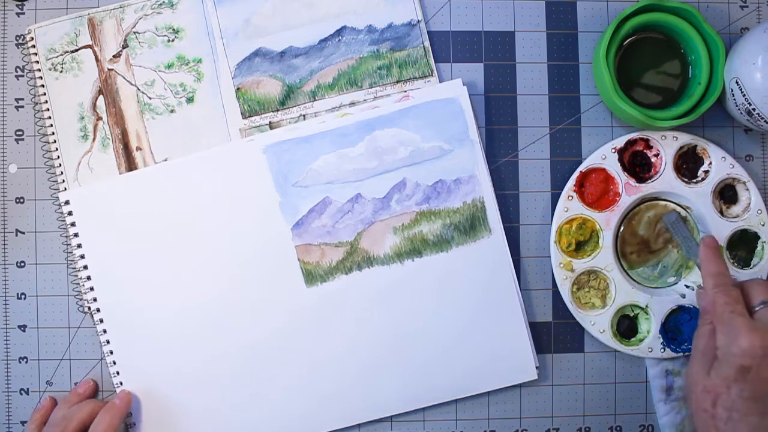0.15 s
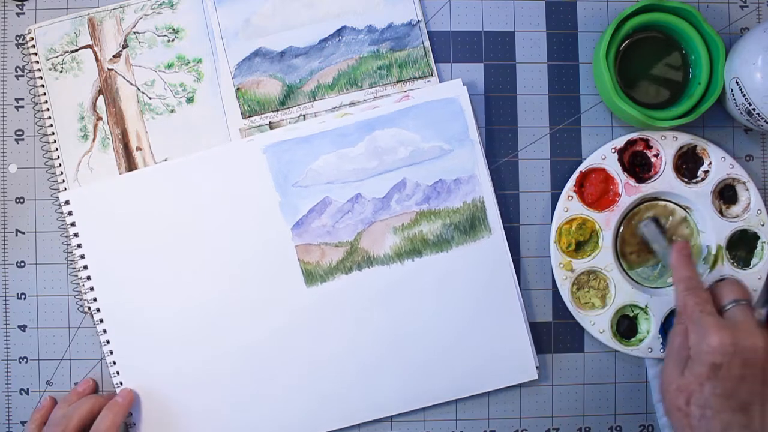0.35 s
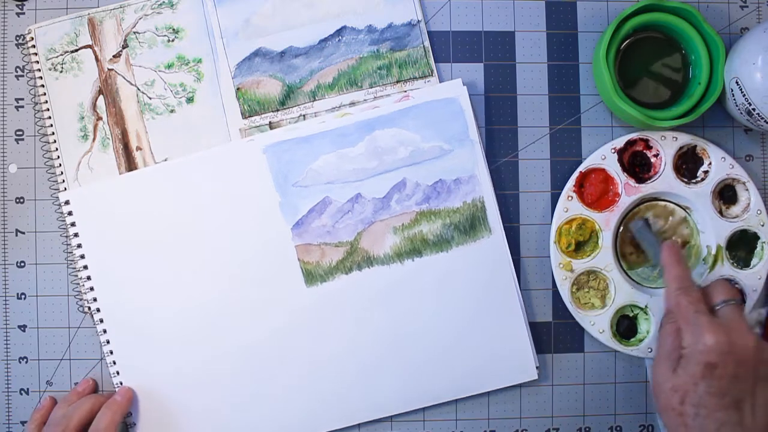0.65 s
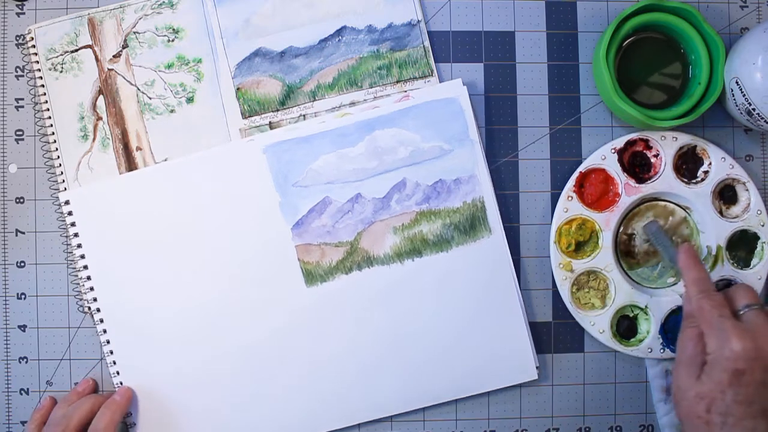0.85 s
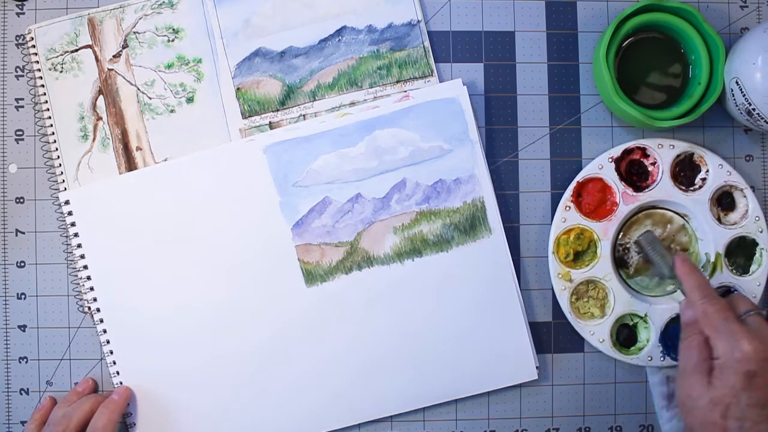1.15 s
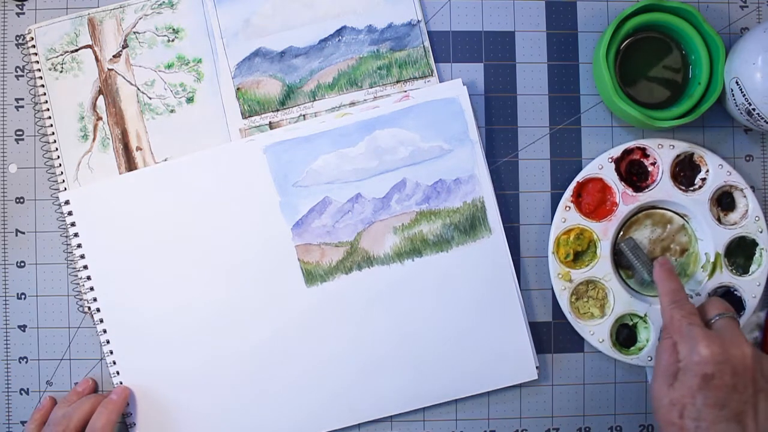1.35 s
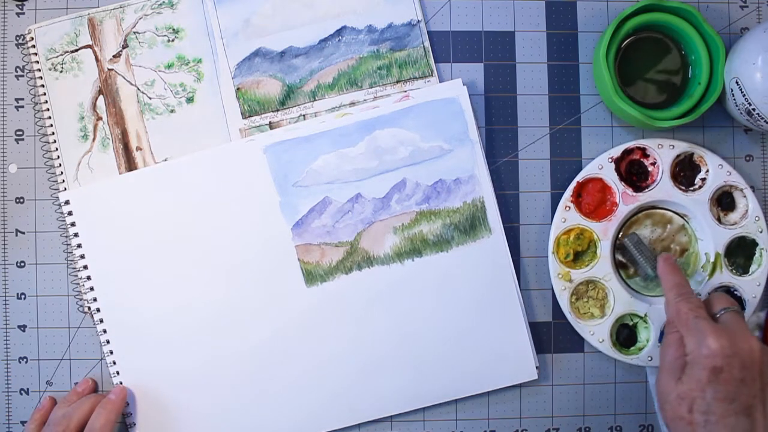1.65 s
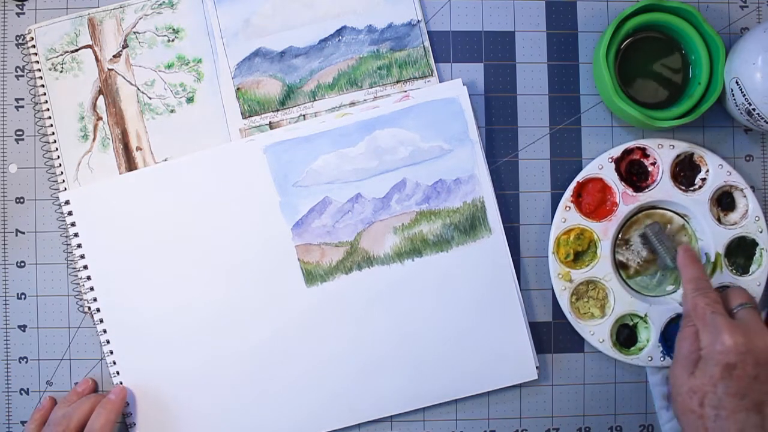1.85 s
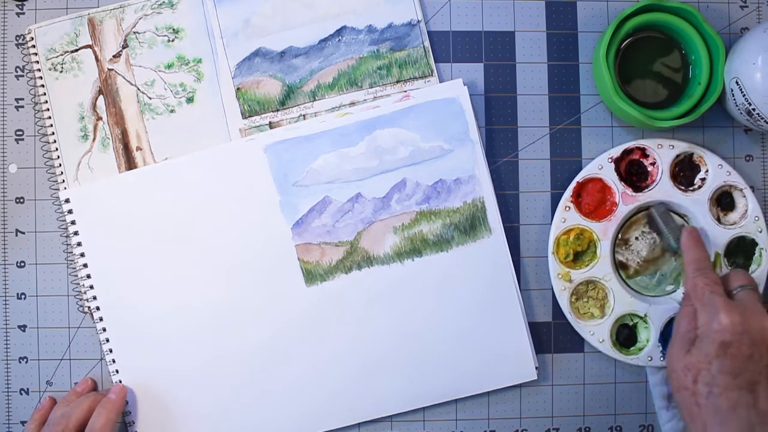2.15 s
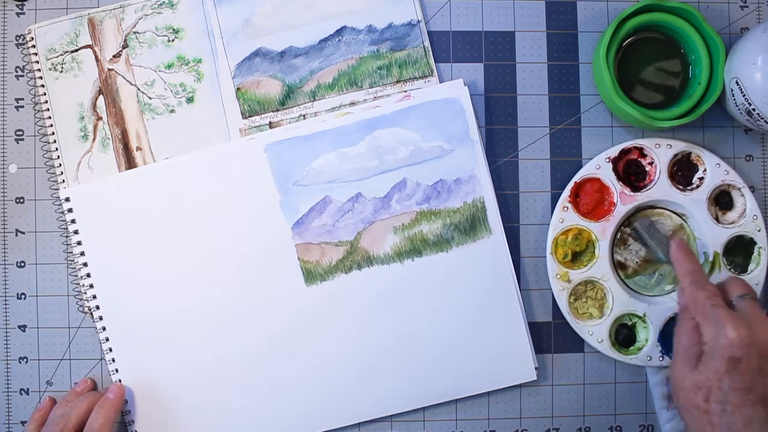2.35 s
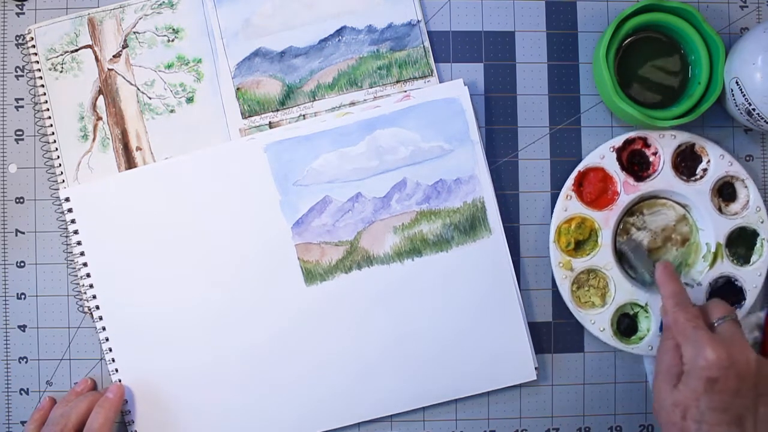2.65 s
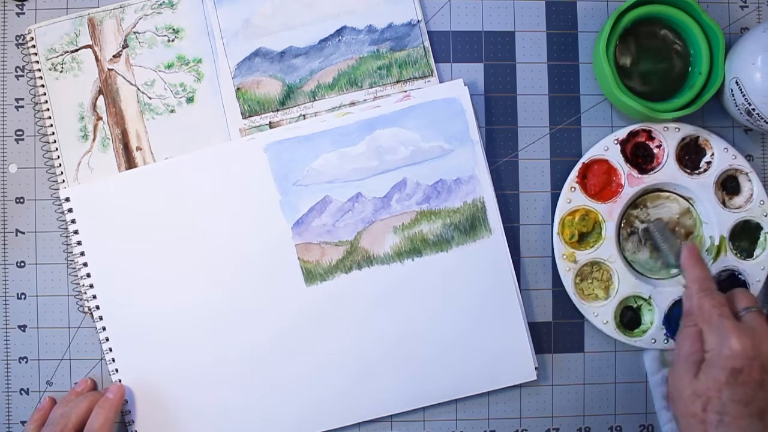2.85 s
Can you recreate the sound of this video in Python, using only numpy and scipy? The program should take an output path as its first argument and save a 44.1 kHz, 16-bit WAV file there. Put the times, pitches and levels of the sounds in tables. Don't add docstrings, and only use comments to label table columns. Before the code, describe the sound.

After a faint brush of cloth, stiff bristles scrape hollow plastic in quick separate strokes with clicking attacks and soft low knocks, heard close in a small, dull room with faint low hum.

```python
import sys
import numpy as np
from scipy import signal
from scipy.fft import rfft, irfft
from scipy.io import wavfile
from scipy.ndimage import uniform_filter1d

SR = 44100
rng = np.random.default_rng(int(sys.argv[2]) if len(sys.argv) > 2 else 0)


def generate_wav(signal):
    frames = np.transpose(np.atleast_2d(signal))
    scaled = np.clip(frames, -1, 1) * 32767
    pcm = np.round(scaled).astype(np.int16)
    wavfile.write(sys.argv[1], SR, pcm)


def ratio_of_db(decibels):
    return 10 ** (np.asarray(decibels, float) / 20)


N = 132300

# frequency_hz, width_hz, level_db
PALETTE_MODES = [(877, 110, -7), (1043, 100, -0.5), (1228, 217, -7.5), (1499, 158, -4.5), (1665, 106, 1.5),
                 (1970, 136, 1), (2552, 70, -9.5), (2700, 117, 1.5), (2923, 97, -14.5), (3800, 370, -9),
                 (4473, 395, -7.5), (6366, 360, -13), (6690, 440, -14.5), (7440, 1600, -35)]
PLACE_SPREAD = 0.58


def unit(x):
    return x / np.sqrt(np.mean(x ** 2))


def ring(x, hz, width_hz):
    return signal.lfilter(*signal.iirpeak(hz, hz / width_hz, fs=SR), x)


def colour(x, points):
    hz, db = np.array(points, float).T
    f = np.maximum(np.arange(2049) * SR / 4096, 1)
    log_gain = np.interp(np.log(f), np.log(hz), db) * np.log(10) / 20
    cepstrum = irfft(log_gain)
    cepstrum[1:2048] *= 2
    cepstrum[2049:] = 0
    response = irfft(np.exp(rfft(cepstrum)))
    return signal.fftconvolve(x, response)[:N]


def walk(rate):
    hold = int(SR / rate)
    steps = np.repeat(rng.standard_normal(N // 100), hold)[:N]
    return unit(uniform_filter1d(steps, hold))


def clicks(rate, spread_db):
    happens = rng.random(N) < rate / SR
    size = ratio_of_db(spread_db * rng.exponential(size=N))
    sign = rng.choice([-1, 1], N)
    return unit(happens * size * sign)


def curve(tables, column):
    t = np.arange(N) / SR
    out = np.zeros(N)
    for rows in tables:
        points = np.array(rows, float)
        value = np.interp(t, points[:, 0], points[:, column])
        if column == 1:
            value = ratio_of_db(value)
        out += value * (t >= points[0, 0]) * (t < points[-1, 0])
    return out


def hum():
    # frequency_hz, density_db
    hum_spectrum = [(15, -56), (25, -9), (107, 0.5), (340, -1), (433, 0), (509, -4), (762, -11), (895, -8),
                    (15500, -25.5)]
    level_db = -57 + 1.7 * walk(4.4)
    return ratio_of_db(level_db) * unit(colour(rng.standard_normal(N), hum_spectrum))


def sleeve():
    # start_s, level_db
    sleeve_level = [(0.0, -61), (0.088, -42.5), (0.132, -46), (0.144, -35.5), (0.258, -59.5),
                    (0.288, -48.5), (0.298, -64), (0.35, -62)]
    # frequency_hz, density_db
    cloth_spectrum = [(88, -33), (150, -7), (726, -8), (1210, -2), (1720, -8.5), (1950, -9.5),
                      (3390, -19.5), (7050, -17), (12000, -35.5), (15600, -74), (22000, -120)]
    grains = clicks(3000, spread_db=2)
    return curve([sleeve_level], column=1) * unit(colour(grains, cloth_spectrum))


def palette(push, bright):
    out = np.zeros(N)
    for k, (hz, width_hz, level_db) in enumerate(PALETTE_MODES):
        tilt = ratio_of_db(bright * np.log2(hz / 2000))
        share = 1 + PLACE_SPREAD * rng.standard_normal(N)
        out += (-1) ** k * ratio_of_db(level_db) * ring(push * tilt * share, hz, width_hz)
    return out


def body(push, bright, snap_db):
    # frequency_hz, density_db
    bristle_spectrum = [(600, -22), (1000, -18), (3000, 2.5), (5000, -10.5), (8500, -8), (10500, -45),
                        (15000, -42.5)]
    mode_power = sum(ratio_of_db(2 * level_db) * width_hz for _, width_hz, level_db in PALETTE_MODES)
    ring_rms = np.sqrt(mode_power * np.pi / SR * (1 + PLACE_SPREAD ** 2))
    impulse_response = colour(np.eye(1, N)[0], bristle_spectrum)
    snap_rms = np.sqrt(np.sum(impulse_response ** 2))
    snap = colour(push * ratio_of_db(1.9 * bright), bristle_spectrum) / snap_rms
    return palette(push, bright) / ring_rms + ratio_of_db(snap_db) * snap


def flicks():
    # start_s, peak_db, brightness_db_per_octave
    tuft_releases = [(0.187, -44, 8), (0.2289, -50, 12), (0.3671, -24, 0), (0.3859, -9.5, -0.5),
                     (0.4269, -23, 9.5), (0.4794, -27, 9), (0.5151, -27.5, 5), (0.575, -36.5, 11),
                     (0.5856, -17, -6), (0.7147, -14, -0.5), (0.7301, -6.5, -1), (0.8031, -25.5, 4),
                     (1.034, -10.5, -2), (1.1701, -25, 1), (1.3477, -10.5, 1), (1.3627, -13.5, 2.5),
                     (1.3794, -16, 1), (1.4491, -17, 0), (1.4561, -11, -2.5), (1.505, -28.5, 6),
                     (1.667, -7, 0), (1.9269, -11, 5.5), (2.164, -11, 1), (2.2262, -20.5, 2.5),
                     (2.2552, -17, -9), (2.5799, -18, 4.5), (2.595, -8.5, -4.5), (2.6787, -27, -5),
                     (2.6842, -22, 5.5), (2.7621, -13, 4.5)]
    decay_s, level_db = 0.0011, -15.5
    push, bright = np.zeros(N), np.zeros(N)
    t = np.arange(300) / SR
    for start_s, peak_db, tilt in tuft_releases:
        i = int(start_s * SR)
        burst = rng.standard_normal(len(t)) * np.exp(-t / decay_s)
        push[i:i + len(t)] += 4 * ratio_of_db(peak_db + level_db) * burst
        bright[i:i + len(t)] = tilt
    return body(push, bright, snap_db=-11)


def rocking(press, hz, width_hz):
    noise = rng.standard_normal(N)
    return press * unit(ring(ring(noise, hz, width_hz), hz, width_hz))


def scrub():
    # start_s, level_db,
    # brightness_db_per_octave
    first_strokes = [
        [(0.36, -53, 0), (0.366, -41, 0), (0.378, -46, 0), (0.388, -29, 0), (0.398, -35.5, 0),
         (0.426, -28.5, 0), (0.536, -42, 0), (0.586, -30, 0), (0.61, -60, 0)],
        [(0.7, -71, 0), (0.702, -54, 0), (0.706, -29.5, 0), (0.734, -26, 0), (0.758, -34, 0),
         (0.908, -37, 0.005), (0.93, -63, 0)],
        [(1.025, -27.5, 0), (1.033, -28.5, 0), (1.053, -22.5, 0), (1.059, -29.5, 0), (1.145, -39.5, 0),
         (1.207, -31.5, 0.0038), (1.23, -65, 0)],
        [(1.34, -84, 0), (1.346, -32, 0), (1.364, -20, 0), (1.396, -33, 0), (1.44, -33.5, 0), (1.456, -29, 0),
         (1.474, -40, 0), (1.568, -36, 0.0041), (1.59, -68, 0)],
    ]
    last_strokes = [
        [(1.66, -40, 0), (1.668, -17.5, 0), (1.694, -22.5, 0), (1.742, -42.5, 0), (1.808, -37.5, 0),
         (1.83, -69, 0)],
        [(1.92, -71, 0), (1.922, -52, 0), (1.928, -27, 0), (1.94, -24.5, 0), (1.956, -25.5, 0),
         (2.014, -42.5, 0), (2.056, -35.5, 0), (2.09, -66, 0)],
        [(2.155, -43, 0), (2.165, -25, 0), (2.187, -29.5, 0.0045), (2.261, -28, 0), (2.271, -37.5, 0),
         (2.355, -29.5, 0), (2.401, -34, 0), (2.45, -50, 0)],
        [(2.575, -44, 0), (2.579, -27, 0), (2.595, -19.5, 0), (2.669, -37.5, 0), (2.687, -32.5, 0),
         (2.699, -37.5, 0), (2.747, -29.5, 0), (2.857, -36, 0), (2.88, -57, 0.0052)],
    ]
    strokes = list(first_strokes) + list(last_strokes)
    press = curve(strokes, column=1)
    bunching = ratio_of_db(2 * walk(120))
    snaps = clicks(2500, spread_db=2.5)
    push = press * unit(snaps * bunching)
    plastic = body(push, curve(strokes, column=2), snap_db=-8.5)
    thud = ratio_of_db(-28.5) * rocking(press, hz=127, width_hz=148)
    knock = ratio_of_db(-34.5) * rocking(press, hz=536, width_hz=180)
    return plastic + thud + knock


def room(x):
    t60_s, gap_s, top_hz, level_db = 0.32, 0.004, 4100, -16
    t = np.arange(SR // 2) / SR
    tail = rng.standard_normal(len(t)) * ratio_of_db(-60 * t / t60_s) * (t > gap_s)
    tail = signal.lfilter(*signal.butter(1, top_hz, fs=SR), tail)
    tail /= np.sqrt(np.sum(tail ** 2))
    return ratio_of_db(level_db) * signal.fftconvolve(x, tail)[:N]


def scene():
    near = sleeve() + flicks() + scrub()
    return (near + room(near) + hum())[None]


def roll_off(x):
    return signal.sosfilt(signal.butter(12, 15730, fs=SR, output="sos"), x)


def record(dry):
    low_pass = signal.ellip(8, 0.2, 70, 15700, fs=SR, output="sos")
    mix = signal.sosfilt(low_pass, dry)
    return roll_off(mix)


dry = scene()
out = record(dry)
generate_wav(out)
```